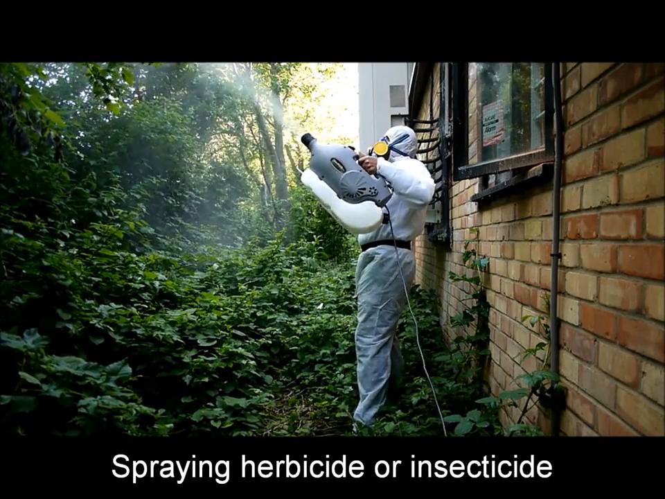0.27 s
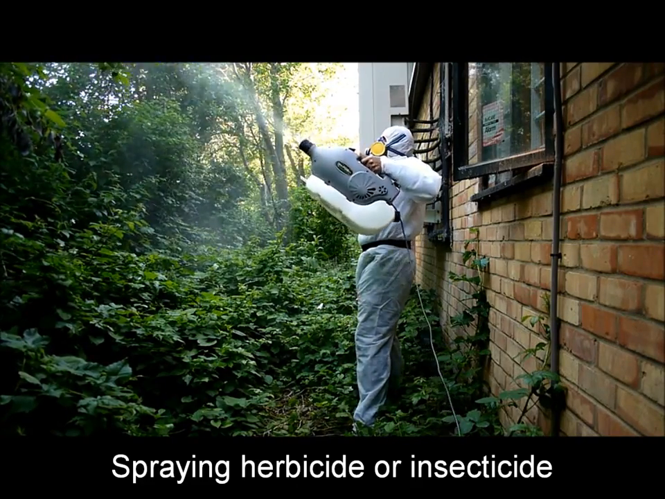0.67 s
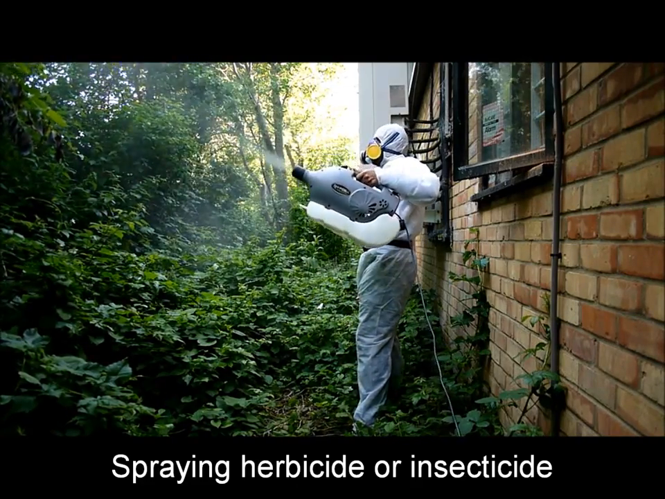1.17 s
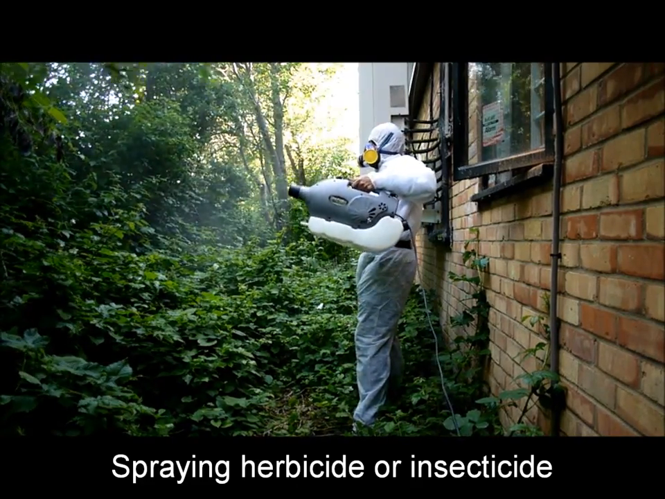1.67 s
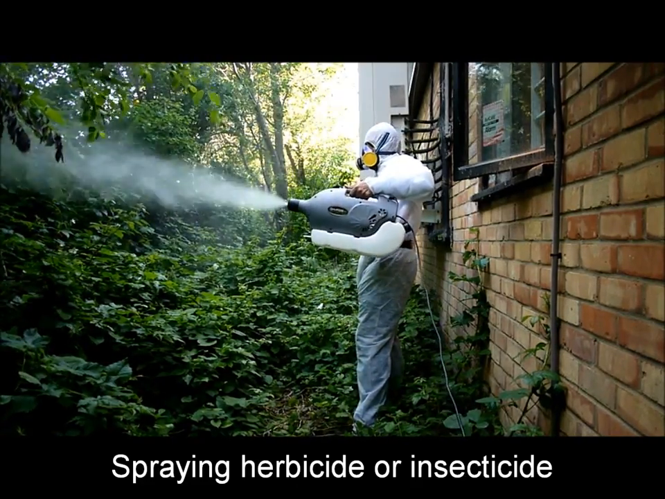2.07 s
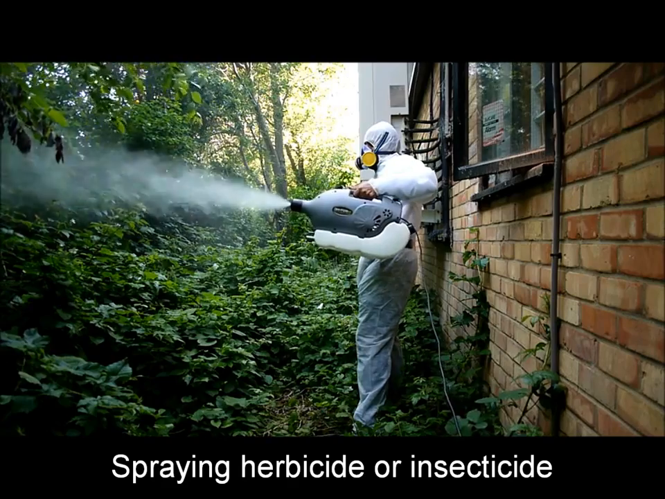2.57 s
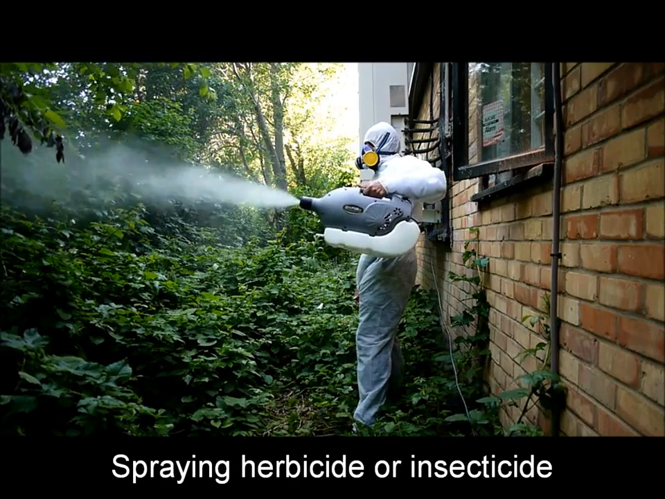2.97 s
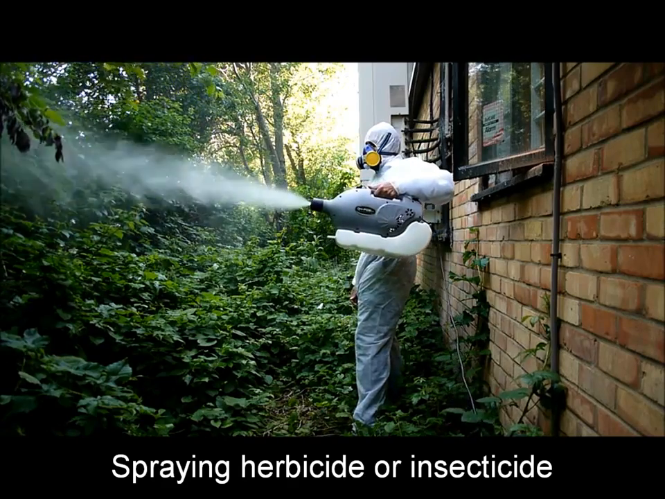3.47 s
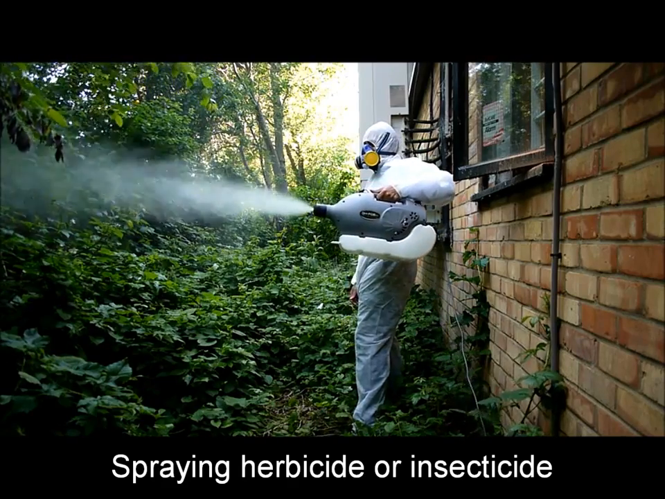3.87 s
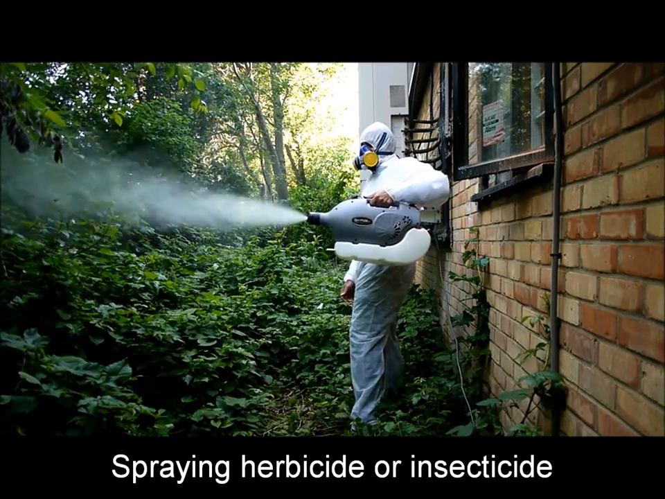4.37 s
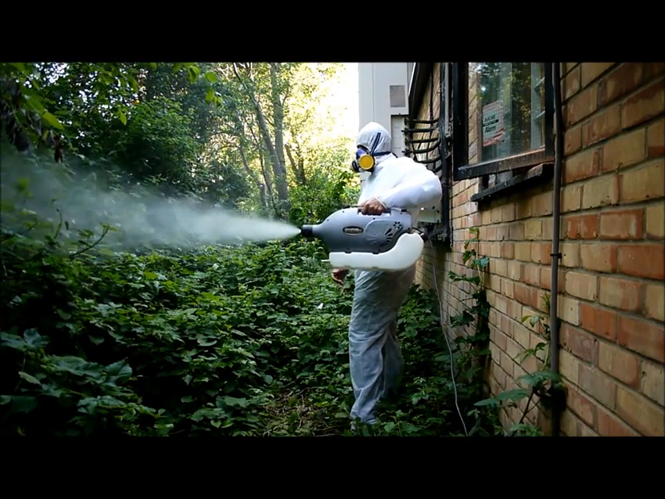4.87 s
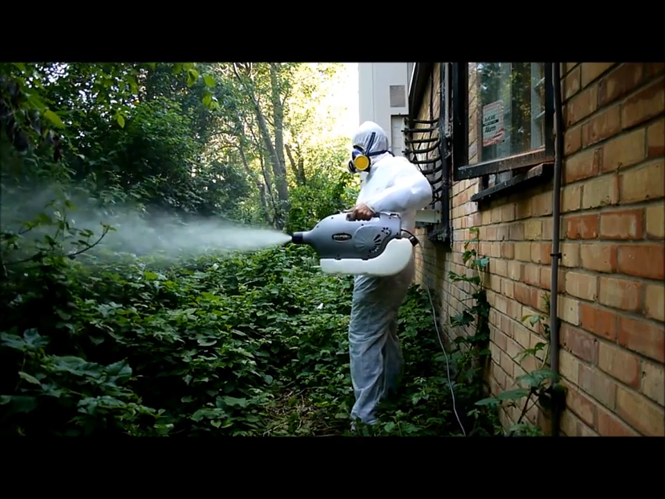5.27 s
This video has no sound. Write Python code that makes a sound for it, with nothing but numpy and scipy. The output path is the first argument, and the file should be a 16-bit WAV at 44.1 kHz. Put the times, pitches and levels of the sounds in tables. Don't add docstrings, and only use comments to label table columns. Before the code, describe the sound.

From 0 s an electric fogger is already running a few metres away, in a yard between a brick wall and shrubs. A steady, clean motor tone around 560 Hz and a thin blade whine near 5 kHz sit in wide, bright rushing air. The high whine is strongest in the first half second, then flickers between left and right as the machine is lowered, and the airflow gradually softens. Far behind, a faint engine rises in pitch over low traffic rumble, with a slight mains hum. At about 1.9 to 2.1 s, liquid reaches the nozzle with a few tiny, crisp spits. A hollow roar joins the hiss, with a fuzzy whistle near 500 Hz that steadies around 2.8 s and slowly sinks. Short ground and wall echoes give the hiss a shifting, phasey colour, and leaves scatter it. From 3 s everything fades steadily, nearly gone by 5.5 s.

```python
import sys
import numpy as np
from scipy import signal
from scipy.fft import rfft, irfft, next_fast_len
from scipy.io import wavfile
from scipy.ndimage import uniform_filter1d, map_coordinates

SR = 44100
rng = np.random.default_rng(int(sys.argv[2]) if len(sys.argv) > 2 else 0)


def ratio(d):
    e = np.asarray(d, float) / 20
    return 10 ** e


def transcribe(u):
    v = np.clip(np.atleast_2d(u).T, -1, 1)
    q = np.round(v * 32767).astype(np.int16)
    wavfile.write(sys.argv[1], SR, q)


N = 244314
LIQUID_S, LIQUID_RISE_S = 1.88, 0.02


def read(points, hz):
    f, value = np.transpose(points)
    return np.interp(np.log(hz + 1), np.log(f + 1), value)


def columns(rows, t):
    s, *rest = np.transpose(rows)
    return [np.interp(t, s, column) for column in rest]


def evened(x):
    return x / np.sqrt(np.mean(abs(x) ** 2) + 1e-20)


def smoothed(x, width, axis=-1):
    return uniform_filter1d(uniform_filter1d(x, int(width), axis=axis), int(width), axis=axis)


def drift(width, size=N):
    return evened(smoothed(rng.standard_normal(size), width))


def bump(hz, centre_hz, width_hz, db):
    return ratio(db / (1 + ((hz - centre_hz) / width_hz) ** 2))


def turn_on(t, s, rise_s):
    return 0.5 + 0.5 * np.tanh((t - s) / rise_s * 2)


def fade_db(t):
    from_s, to_s, power = 3, 5.906, 0.98
    left = np.clip((to_s - t) / (to_s - from_s), 1e-3, 1)
    return 20 * power * np.log10(left)


def level_db(t, start_db, lowered_db, late, liquid_db, after_db):
    lowered = np.clip(t / LIQUID_S, 0, 1)
    lowered = lowered - late * lowered * (1 - lowered)
    db = start_db + lowered_db * lowered
    db = db + liquid_db * turn_on(t, LIQUID_S, LIQUID_RISE_S)
    db = db + after_db * np.maximum(t - LIQUID_S, 0)
    return db + fade_db(t)


# pitch_hz, left_leads_rad
PORT_LEAD = [(50, 0), (560, 0.44), (1500, 0.78), (2700, .9), (4500, 0.37), (6500, 0.47), (8000, 0)]
# pitch_hz, left_over_right_db
PORT_TILT = [(60, 2), (500, 1.1), (1000, .3), (4000, 0.5), (8000, -0.5)]


def ports(turns, db, hz, pan_db=0):
    side = np.array([[0.5], [-0.5]])
    gain = ratio(db + side * (read(PORT_TILT, hz) + pan_db))
    return np.sqrt(2) * gain * np.cos(2 * np.pi * turns + side * read(PORT_LEAD, hz))


# time_s, pitch_hz, level_db
ENGINE = [(0, 127.5, -50), (.7, 129, -51.5), (1.8, 138, -58.5), (3.1, 146, -60), (4.3, 152, -75)]


def far_engine():
    t = np.arange(N) / SR
    hz, db = columns(ENGINE, t)
    gone_db = 25 * np.clip(t - ENGINE[-1][0], 0, 9)
    turns = np.cumsum(hz) / SR + 0.045 * drift(2500)
    return ports(turns, db - gone_db + 0.54 * drift(2500), 135)


def mains_buzz():
    t = np.arange(N) / SR
    db = level_db(t, *AIR_LEVELS[-1]) - 6.5 + 1.5 * drift(3000)
    return ports(100 * t + 0.066 * drift(3000), db, 100)


# start_db, change_while_lowered_db, late_share, jump_with_liquid_db, after_db_per_s
AIR_LEVELS = [
    (-38.5, -6, -.2, 2.5, -0.6),
    (-39.5, -6.5, .2, 6.5, -1.5),
    (-26, -6, -0.15, -0.65, -0.37),
    (-21, -2, 1.5, -3.5, -0.68),
    (-50.5, -7.5, .5, 2, -0.6),
]
# pitch_hz, level_db
CASING = [(140, -35), (175, -22), (205, -17), (240, -16.5), (290, -10), (315, -3), (360, 0), (430, -4),
          (460, -8.5), (520, -28.5)]
ROAR = [(420, -40.5), (470, -21.5), (590, -21.5), (700, -14.5), (730, -13.5), (800, -16), (1100, -15.5),
        (1250, -16), (1450, -16), (1700, -31.5)]
INTAKE = [(790, -26), (1350, -16.5), (1600, -9.5), (1960, -9.5), (2410, -12), (2860, -7.5), (3590, -7),
          (4800, -4), (4880, -8.5), (5100, -7), (6630, -25), (11200, -120)]
JET = [(4700, -22.5), (5100, -8.5), (5400, -9.5), (5800, -5.5), (6400, -5), (7000, -4.5), (7500, -3),
       (8400, -5)]
TRAFFIC = [(25, -36), (45, -23), (65, -4.5), (95, 8.5), (125, -6), (165, -10), (220, -18.5)]
# pitch_hz, width_hz, level_db
DUCTS = [
    (1620, 90, -4),
    (2400, 100, 3),
    (2850, 150, -4),
    (3280, 80, 2),
]
# pitch_hz, width_hz, facing_db, facing_at_s, length_s
OPENINGS = [(2020, 51, 6, 3.2, 1.9), (3706, 53, 11, 2.8, 2.5), (4224, 80, 7.5, 2, 1.6),
            (1310, 60, 4, 0.72, .3), (1350, 78, 6, 9.3, 1.3), (5850, 130, 3, 0.63, 0.56),
            (3300, 100, 3, 1.5, 1.5), (7350, 130, 3, 2.5, 0.72)]
# pitch_hz, width_hz, dry_db, wet_db
LIQUID_COLOUR = [
    (745, 150, -4.5, 0),
    (7620, 91, -1.5, -1),
]


def air_power(t, hz):
    frames = len(t)
    ducts = np.prod([bump(hz, *row) for row in DUCTS], axis=0)
    levels = [level_db(t, *row) for row in AIR_LEVELS]
    levels[-1] = levels[-1] - 5
    power = 0
    for colour, db in zip((CASING, ROAR, INTAKE, JET, TRAFFIC), levels):
        inside = (hz > colour[0][0]) * (hz < colour[-1][0])
        shape = (ratio(read(colour, hz)) * ducts * inside) ** 2
        flutter_db = 0.52 * drift(5.1, size=frames)
        power = power + np.outer(shape / shape.sum(), ratio(db + flutter_db) ** 2)
    hz = hz[:, None]
    for centre_hz, width_hz, db, s, length in OPENINGS:
        facing_db = -2 + db * np.exp(-((t - s) / length) ** 2)
        swayed_hz = centre_hz + 40 * drift(60, size=frames)
        power = power * bump(hz, swayed_hz, width_hz, facing_db) ** 2
    wet = turn_on(t, LIQUID_S, LIQUID_RISE_S)
    for centre_hz, width_hz, dry_db, wet_db in LIQUID_COLOUR:
        power = power * bump(hz, centre_hz, width_hz, dry_db + (wet_db - dry_db) * wet) ** 2
    return power


# time_s, ground_ms, wall_ms
ECHO_MS = [(0, 0.825, 1.67), (.7, 0.847, 1.6), (1.4, 0.89, 1.64), (2.1, 0.956, 1.57), (2.8, 0.903, 1.6),
           (3.3, 0.843, 1.69), (3.85, 0.817, 1.8), (4.25, 0.815, 1.29), (4.9, 0.85, 1.36), (5.54, .9, 1.6)]
RIGHT_LATER_MS = [0.023, 0.045]


def echo_comb(t, hz, side):
    ground_ms, wall_ms = columns(ECHO_MS, t)
    ground_share = 0.3 - 0.86 * (ground_ms - ECHO_MS[0][1])
    comb = 1
    for ms, share, later_ms in zip((ground_ms, wall_ms), (ground_share, 0.065), RIGHT_LATER_MS):
        delay_s = (ms + (0.5 - side) * later_ms) / 1000
        comb = comb + share * np.exp(-2j * np.pi * hz * delay_s)
    return comb


def leaf_scatter_db(frames, hz):
    streaks = []
    for noise in rng.standard_normal((3, 400, frames)):
        noise = smoothed(noise, 6, axis=0)
        streaks.append(evened(smoothed(noise, 80, axis=1)))
    shared, *own = streaks
    return (1.3 * shared + 1.5 * np.array(own)) * hz / (hz + 700)


# pitch_hz, alike_share
PORT_LIKENESS = [(60, 0.95), (500, 1), (1200, 0.97), (2500, 0.81), (4500, 0.69), (7500, 0.91)]


def air():
    frames = N // 256 + 9
    t = np.arange(frames) * 256 / SR
    hz = np.fft.rfftfreq(2048, 1 / SR)[:400]
    power = air_power(t, hz)
    hz = hz[:, None]
    side = np.array([0.5, -0.5])[:, None, None]
    real, imaginary = rng.standard_normal((2, 3, 400, frames))
    noise = real + 1j * imaginary
    direct = noise[0] * echo_comb(t, hz, side) * np.exp(1j * side * read(PORT_LEAD, hz))
    scattered = noise[1:]
    same = np.clip(read(PORT_LIKENESS, hz), 0, 1)
    z = np.sqrt(same) * direct + np.sqrt(1 - same) * scattered
    z = z * np.sqrt(power) * ratio(side * read(PORT_TILT, hz) + leaf_scatter_db(frames, hz))
    z = np.pad(z, ((0, 0), (0, 625), (0, 0)))
    return 1.5 * signal.istft(z, nperseg=2048, noverlap=1792)[1][:, :N]


# time_s, level_db, pitch_hz, length_s
SPUTTERS = [
    (1.889, -34, 1130, .006),
    (1.9, -41, 800, .006),
    (1.983, -43, 2050, .005),
    (2.0, -29, 8050, .007),
    (2.0, -25, 8230, .007),
    (2.078, -43, 2020, .005),
]


def sputters():
    t, out = np.arange(N) / SR, 0
    for s, db, hz, length in SPUTTERS:
        puff = np.exp(-((t - s) / length) ** 2)
        out = out + puff * ports(hz * t + 0.19 * drift(150), db, hz)
    return out


# pitch_hz, width_hz, steady_share
WHISTLE = [
    (511, 36, .2),
    (501, 21, 1.0),
]


def whistle():
    t = np.arange(N) / SR
    lock_s = 2.8
    locked = turn_on(t, lock_s, 0.08)
    hz, width_hz, steady = (loose + (firm - loose) * locked for loose, firm in zip(*WHISTLE))
    hz = hz - 3.6 * np.maximum(t - lock_s, 0)
    steps = np.cumsum(np.clip(width_hz, 1, 60)) / SR
    knots = rng.standard_normal((400, 2)).T / np.sqrt(2)
    real, imaginary = (map_coordinates(row, [steps], order=3) for row in knots)
    ride = (real + 1j * imaginary + steady) / np.sqrt(1 + steady ** 2)
    onset = np.clip((t - LIQUID_S) / 0.1, 0, 1)
    turns = np.cumsum(hz + 2.2 * drift(1800)) / SR + np.angle(ride) / (2 * np.pi)
    return onset * np.sqrt(abs(ride)) * ports(turns, -43 + fade_db(t), 500, 1.2)


# time_s, level_db, left_over_right_db, left_leads_rad, length_s
GLINTS = [(0, -26.5, -2.5, 0.7, 0.12), (0.374, -23.5, -2, 0.33, 0.27), (0.798, -39, -8, .3, 0.15),
          (1.05, -32.5, -2.5, -0.7, .12), (1.306, -36.5, 6, -.1, 0.19), (1.603, -39, -5, 0, .1),
          (1.94, -46, -2, 3.6, 0.09), (2.36, -36, -4, 0.7, 0.29), (2.7, -44, -3, -3, .1),
          (3.047, -43, -10.5, .9, 0.21), (3.301, -40, 4, 0.2, 0.16), (3.62, -41.5, -1.5, 2, 0.19),
          (3.93, -41.5, -3, 0.4, 0.21), (4.25, -41.5, 0.5, 1.6, 0.15), (4.62, -48, 3, .2, 0.12),
          (4.892, -46.5, -6, -0.3, 0.14), (5.196, -51.5, -6, 0.6, 0.13), (5.53, -53.5, -3, .4, 0.11)]


def blade_whine(turns):
    t = np.arange(N) / SR
    side = np.array([[0.5], [-0.5]])
    beam = 0
    for s, db, pan_db, lead, length in GLINTS:
        glint = np.exp(-((t - s) / length) ** 2)
        beam = beam + ratio(db + side * pan_db) * np.exp(1j * side * lead) * glint
    phase = 2 * np.pi * (9 * turns + 0.004 * drift(700))
    return np.sqrt(2) * (beam * ratio(0.3 * drift(600)) * np.exp(1j * phase)).real


# time_s, level_db
SHAFT_LEVEL = [(0.04, -24.5), (0.27, -27.5), (0.34, -32), (0.52, -28.5), (0.82, -35), (1.36, -30),
               (1.65, -30), (1.86, -33), (1.99, -30.5), (2.82, -27.5), (3.63, -34), (3.93, -30.5),
               (4.31, -36.5), (4.37, -33), (4.54, -34.5), (4.69, -39), (4.91, -38), (5.5, -48)]
# time_s, pitch_hz
SHAFT_SPEED = [(0, 559.0), (.3, 558.7), (1.3, 558.15), (1.9, 558.5), (2.6, 559.4), (3.5, 559.55),
               (4.5, 559.5), (5.54, 559.7)]
# multiple_of_shaft, level_below_shaft_db
OVERTONES = [
    (2, -32),
    (3, -30.5),
]


def motor():
    t = np.arange(N) / SR
    shaft_db = columns(SHAFT_LEVEL, t)[0]
    turns = np.cumsum(columns(SHAFT_SPEED, t)[0]) / SR
    out = ports(turns, shaft_db + 0.54 + 0.067 * drift(500), 500)
    for k, db in OVERTONES:
        overtone_db = shaft_db + db + 2.0 * drift(2800)
        out = out + ports(k * turns + 0.033 * drift(2500), overtone_db, k * 560)
    return out + blade_whine(turns)


def scene():
    return far_engine() + mains_buzz() + air() + sputters() + whistle() + motor()


def ragged_top(x):
    hz, t, z = signal.stft(x, SR, nperseg=1024)
    edge_hz = rng.choice([8020, 8110, 8190, 8190, 8240, 8280, 8280], len(t))
    edge_hz = np.repeat(edge_hz, 3)[:len(t)]
    return signal.istft(z * (hz[:, None] < edge_hz), SR, nperseg=1024)[1][:, :N]


def roll_off(x):
    return signal.sosfilt(signal.butter(12, 9020, fs=SR, output="sos"), x)


# pitch_hz, level_db
BAND_EDGE = [(7500, 0), (7650, -3), (7800, -9), (7930, -18), (8000, -33), (8050, -23), (8300, -30),
             (8370, -110)]


def record(dry):
    size = next_fast_len(N + 4096)
    edge = ratio(read(BAND_EDGE, np.fft.rfftfreq(size, 1 / SR)))
    edged = irfft(rfft(dry, size) * edge, size)[:, :N]
    soft_start = np.clip(np.arange(N) / 20 + 0.3, 0, 1)
    return roll_off(ragged_top(edged) * soft_start)


dry = scene()
out = record(dry)
transcribe(out)
```